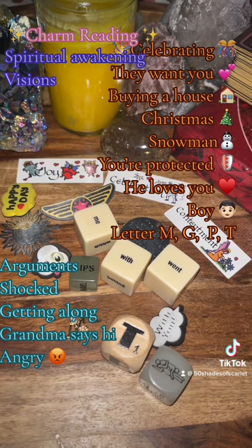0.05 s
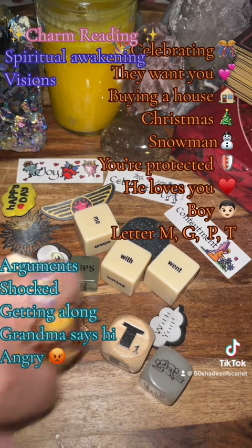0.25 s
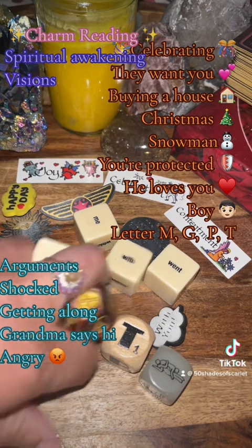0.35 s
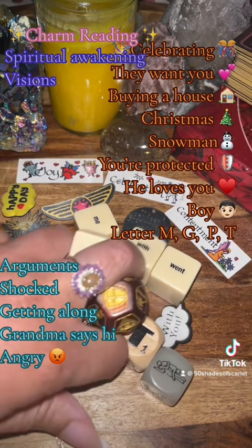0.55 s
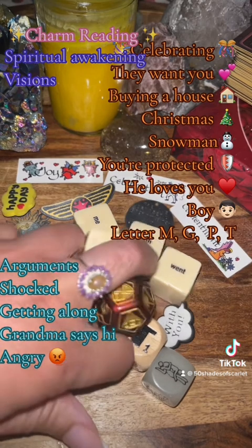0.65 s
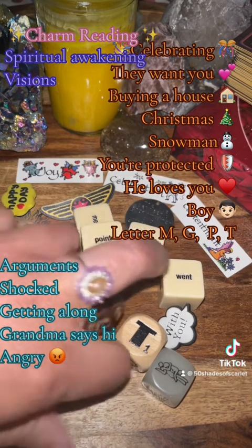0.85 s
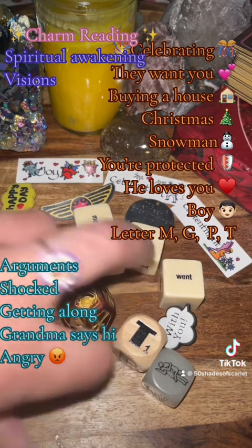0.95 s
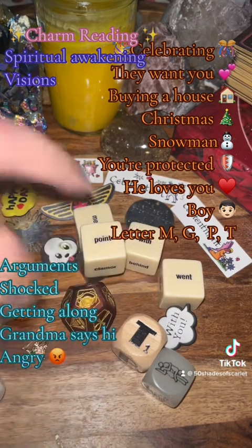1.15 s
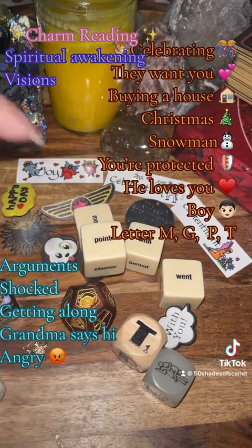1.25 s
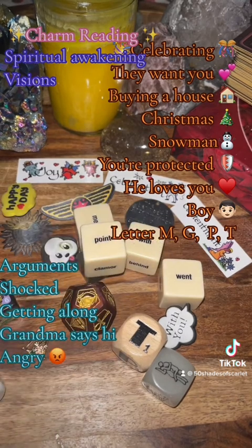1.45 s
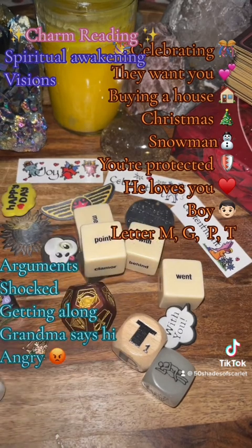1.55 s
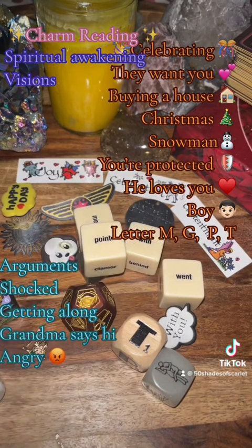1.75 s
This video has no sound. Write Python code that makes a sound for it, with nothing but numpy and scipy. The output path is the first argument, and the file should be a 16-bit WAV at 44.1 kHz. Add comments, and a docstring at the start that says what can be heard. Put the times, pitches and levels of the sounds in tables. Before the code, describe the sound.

After a brief brush of handling, dice tumble onto wood with woody knocks, low thuds and hard clicks for under a second; then near quiet over low hum, tiny chirps, one charm ping and swelling rubbing.

```python
"""Over low hum and quiet air, a brief brush of handling fades and light charm ticks lead in.
A handful of small dice and charms then tumbles from a hand onto a wooden table, close to the microphone:
shaped pulses thud, knock and click, damped modes ring the board and dice, and a small room answers.
After the tumble has ended come three faint high chirps, tone bursts; one metal charm then pings
as a set of modes, and a soft rustle of rubbing grains and hiss swells over the last moments."""
import sys
import numpy as np
from scipy import signal
from scipy.fft import rfft, irfft, next_fast_len
from scipy.io import wavfile
from scipy.ndimage import map_coordinates

SR = 44100
rng = np.random.default_rng(int(sys.argv[2]) if len(sys.argv) > 2 else 0)


def log_audio(samples):
    """Write samples as a 16-bit WAV file to the path given in sys.argv[1]."""
    # one column per channel
    frames = np.atleast_2d(samples).T
    # limit to full scale, then quantise
    limited = np.clip(frames, -1, 1)
    pcm = np.round(limited * 32767).astype(np.int16)
    wavfile.write(sys.argv[1], SR, pcm)


N = 79380  # scene length, samples
LENGTH = 16384  # length of one struck sound, samples
LEVEL_SPAN = 176  # samples (4 ms) over which a strike's level is set
RING_ATTACK_S = 0.0007


def amp(db):
    """Decibels to linear gain."""
    return 10 ** (np.asarray(db) / 20)


def unit(x):
    """Scale to rms 1."""
    return x / np.sqrt(np.mean(x ** 2) + 1e-20)


def along(points, hz):
    """Read (f/Hz, value) points at the given frequencies, on a log axis."""
    f, v = np.transpose(points)
    return np.interp(np.log(hz + 1), np.log(f + 1), v)


def fade(t, t60):
    """Exponential decay: 60 dB down after t60 seconds."""
    return 1000.0 ** (-t / np.maximum(t60, 1e-4))


def filtered(x, response):
    """Shape the spectrum of x by a response of frequency, with padding against wrap-around."""
    m = next_fast_len(N + SR // 2)
    return irfft(rfft(x, m) * response(np.fft.rfftfreq(m, 1 / SR)), m)[:N]


def add(track, s, sound):
    """Mix a sound in at time s."""
    i = max(0, round(s * SR))
    track[i:i + len(sound)] += sound[:N - i]


def pulse(colour):
    """Spectrum of the sharpest causal (minimum-phase) pulse with this colour."""
    log_gain = np.log(amp(along(colour, np.fft.rfftfreq(LENGTH, 1 / SR))))
    cepstrum = irfft(log_gain)
    # Folding the cepstrum forward in time makes the pulse causal
    cepstrum[1:LENGTH // 2] *= 2
    cepstrum[LENGTH // 2 + 1:] = 0
    return np.exp(rfft(cepstrum))


def strike(spectrum, scatter_db, t60, rise_s):
    """A pulse with a short rise and a quick scatter of rebounds; rms 1 over its first 4 ms."""
    t = np.arange(LENGTH) / SR
    force = rng.standard_normal(LENGTH) * fade(t, t60)
    force *= amp(scatter_db) / np.linalg.norm(force)
    force[0] += 1  # the first impact
    hit = irfft(rfft(force) * spectrum) * (1 - np.exp(-t / rise_s))
    return hit / np.sqrt(np.mean(hit[:LEVEL_SPAN] ** 2))


def ring(modes, gains, spread_db, pitch=1):
    """Damped modes, struck a little differently each time."""
    t = np.arange(LENGTH) / SR
    hz, db, t60 = np.transpose(modes)
    size = gains * amp(db + spread_db * rng.standard_normal(len(hz)))
    rise = 1 - np.exp(-(t / RING_ATTACK_S) ** 2)
    waves = np.sin(2 * np.pi * pitch * hz[:, None] * t) * fade(t, t60[:, None])
    return rise * (size @ waves)


ROOM_DB, ROOM_BUILDUP_S = -9, 0.0033
# Decay of the small room: (f/Hz, t60/s)
ROOM_DECAY = [(150, .26), (600, 0.21), (1400, .24), (3500, 0.21), (7000, 0.35), (14000, .16)]


def in_room(sound):
    """The sound and its room tail: noise that builds up, then decays at its own rate in each band."""
    hz, t, z = signal.stft(rng.standard_normal(LENGTH), SR, nperseg=256)
    tail = signal.istft(z * fade(t, along(ROOM_DECAY, hz)[:, None]), SR, nperseg=256)[1]
    tail *= 1 - np.exp(-(np.arange(len(tail)) / SR / ROOM_BUILDUP_S) ** 2)
    tail /= np.linalg.norm(tail)
    return sound + amp(ROOM_DB) * signal.fftconvolve(sound, tail)[:LENGTH]


BASS_CUT_HZ = 114
# Dice contacts, levels ahead of the bass cut: (t/s, thud level/dB, knock level/dB, click level/dB)
DICE_CONTACTS = [(0.2214, -16, -15.5, -31), (0.2257, -42, -25.5, -34), (0.2338, -23, -20, -35.5),
                 (0.2436, -39, -38, -50), (0.2936, -18.5, -17.5, -39), (0.314, -22, -21, -38),
                 (0.3164, -26, -29, -30.5), (0.324, -34, -22.5, -50), (0.3314, -27.5, -29, -33.5),
                 (0.4398, -27.5, -22.5, -27.5), (0.4491, -44, -30.5, -36), (.4652, -35, -32.5, -35),
                 (0.482, -32.5, -29.5, -43), (0.5028, -36, -27, -39.5), (0.5134, -31.5, -29, -21),
                 (.542, -27, -25, -35), (0.5548, -31, -29.5, -56), (.561, -25.5, -28.5, -30),
                 (.5642, -29, -27.5, -32.5), (0.594, -28.5, -33, -40.5), (0.604, -32, -40, -53),
                 (0.6487, -13.5, -17.5, -26), (0.6581, -25, -29, -43), (.6655, -31.5, -47, -36.5),
                 (0.6689, -29.5, -20.5, -32), (0.6834, -23.5, -21.5, -25), (0.688, -54, -23.5, -30),
                 (0.694, -44, -29, -40.5), (0.7002, -26, -24.5, -36), (0.7124, -27, -22.5, -45),
                 (0.7227, -31, -25, -43), (0.731, -32, -29.5, -37.5), (0.7426, -30, -23.5, -26),
                 (0.75, -35, -37.5, -41), (0.773, -34, -39, -56), (0.7787, -21, -19, -46.5),
                 (.7853, -26.5, -21.5, -55), (0.7953, -24.5, -37, -60), (0.806, -32.5, -39.5, -32),
                 (0.8207, -28, -15, -21.5), (0.8239, -28.5, -42, -45), (0.8315, -36, -31, -35),
                 (0.8375, -43, -53, -38), (0.8493, -28, -21, -55), (0.8512, -29.5, -47, -28.5),
                 (0.859, -56.5, -37.5, -55)]


def dice():
    """Each contact thuds, knocks and clicks in the room, and sets the board and a die ringing."""
    out = np.zeros(N)
    for s, thud_db, knock_db, click_db in DICE_CONTACTS:
        hit = amp(thud_db) * thud() + amp(knock_db) * knock() + amp(click_db) * click()
        ringing = die_ring(click_db) + board_ring(thud_db, knock_db)
        add(out, s, in_room(hit) + ringing)
    bass_cut = signal.butter(2, BASS_CUT_HZ, "highpass", fs=SR, output="sos")
    return signal.sosfilt(bass_cut, out)


# Colour of the board's thud: (f/Hz, relative level/dB)
THUD_COLOUR = [(60, -29), (130, -31), (190, 3), (300, -1), (500, -1.5), (800, -14.5), (1500, -36.5),
               (4000, -85)]


def thud():
    """The deep part of a contact: a low pulse with the longest scatter of rebounds."""
    return strike(pulse(THUD_COLOUR), scatter_db=-3.5, t60=0.036, rise_s=0.00035)


# Colour of the knock: (f/Hz, relative level/dB)
KNOCK_COLOUR = [(150, -35), (450, -9.5), (750, -3), (1150, 1), (1600, -3.5), (2100, -7.5), (3000, -19),
                (7000, -60.5)]


def knock():
    """The woody middle of a contact: a pulse strongest around 1 kHz."""
    return strike(pulse(KNOCK_COLOUR), scatter_db=-5, t60=0.019, rise_s=0.00046)


# Colour of the hard click: (f/Hz, relative level/dB)
CLICK_COLOUR = [(700, -34.5), (1800, 8.5), (2800, 5), (4200, 3.5), (5200, -16.5), (6500, -29), (8500, -41),
                (11000, -60.5), (15000, -57.5)]


def click():
    """The hard edge of a contact: a bright pulse with strong, very short rebounds."""
    return strike(pulse(CLICK_COLOUR), scatter_db=2, t60=0.01, rise_s=0.00086)


THUD_TOP_HZ = 650  # modes below this follow the thud, the others the knock
# Modes of the wooden board: (f/Hz, relative level/dB, t60/s)
BOARD_MODES = [(205.5, -5.5, 0.18), (348.3, -13, .1), (560, -17, 0.1), (804, -12.5, 0.066),
               (1072, -11, .14), (1229, -20, 0.16), (1295, -21, 0.068), (1558, -26.5, 0.23),
               (1700, -21, 0.28), (1822, -17.5, 0.1), (2094, -29.5, 0.23), (2570, -24.5, .2),
               (3220, -23, 0.13)]


def board_ring(thud_db, knock_db):
    """The thud drives the board's low modes, the knock its high ones."""
    low = np.transpose(BOARD_MODES)[0] < THUD_TOP_HZ
    return ring(BOARD_MODES, amp(np.where(low, thud_db, knock_db)), spread_db=3)


DIE_SIZE_SPREAD = 0.034  # spread of log pitch from die to die
# Modes of a middle-sized die: (f/Hz, relative level/dB, t60/s)
DIE_MODES = [(2620, -13, 0.065), (3400, -10, 0.03), (4190, -11.5, 0.031), (5540, -26, 0.044)]


def die_ring(click_db):
    """The click drives the die's own modes; dice of different size shift them all together."""
    pitch = np.exp(DIE_SIZE_SPREAD * rng.standard_normal())
    return ring(DIE_MODES, amp(click_db), spread_db=6, pitch=pitch)


TICK_PIVOT_HZ = 4000  # the brightness tilt turns about this
# Light ticks of the charms: (t/s, level/dB, brightness/dB per octave)
CHARM_TICKS = [(.067, -47, 0.5), (.1155, -35, 1), (.2225, -36, 0.5), (.2255, -30, -2), (.2415, -31, -1),
               (.252, -45, -4), (.2735, -38, 2), (.278, -41, 0), (.3172, -31.5, -0.5), (.4268, -33, -9.5),
               (.434, -40.5, -1), (.5005, -37.5, 2), (.5033, -33.5, 5.5), (0.5106, -31, 2.5),
               (.522, -35, 2.5), (.6488, -28, 1), (0.6814, -36, -7.5), (1.251, -41, -9),
               (1.2645, -49, 10.5), (1.41, -40, -9)]
# Colour of a tick before its tilt: (f/Hz, relative level/dB)
TICK_COLOUR = [(300, -26), (1200, -7), (2800, 4), (4600, 2), (5600, -5), (6600, -13), (9000, -29.5),
               (13000, -34), (16000, -33.5)]


def charm_ticks():
    """Light contacts as short pulses, each tilted duller or brighter, in the room."""
    out = np.zeros(N)
    for s, db, brightness in CHARM_TICKS:
        colour = [(hz, level + brightness * np.log2(hz / TICK_PIVOT_HZ)) for hz, level in TICK_COLOUR]
        tick = strike(pulse(colour), scatter_db=2.5, t60=0.012, rise_s=0.00097)
        add(out, s, in_room(amp(db) * tick))
    return out


PING_S, PING_KNOCK_DB, PING_THUD_DB = 1.2645, -35, -47
# Modes of the metal charm: (f/Hz, level/dB, t60/s)
PING_MODES = [(228, -32, .09), (1040, -48, .06), (2150, -42, .04), (3483, -38, .09), (3455, -55, .7),
              (4064, -54, .06), (5744, -59, .11), (8441, -55, .3)]


def metal_charm():
    """One metal charm knocks the board, and its damped modes ping."""
    out = np.zeros(N)
    hit = amp(PING_KNOCK_DB) * knock() + amp(PING_THUD_DB) * thud()
    add(out, PING_S, in_room(hit) + ring(PING_MODES, 1, spread_db=2.5))
    return out


GRAINS_PER_S, HISS_DB = 830, 2.5  # hiss level is relative to the grains
CLUMP_DB, CLUMPS_PER_S = 4.5, 90  # depth and pace of the grains' random swells
# Course of the handling noise: (t/s, level/dB)
RUSTLE_LEVEL = [(0, -47), (.04, -61.5), (.085, -47), (.12, -67), (.3, -72), (1.25, -71), (1.39, -55),
                (1.43, -51.5), (1.465, -45.5), (1.52, -49.5), (1.575, -43.5), (1.67, -52.5), (1.725, -45.5),
                (1.8, -48)]
# Colour of the handling noise: (f/Hz, relative level/dB)
RUSTLE_TONE = [(300, -9), (700, -9), (1200, 0.5), (2200, -2), (3600, -4.5), (5200, -15), (7000, -28.5),
               (10500, -44.5), (13000, -30.5), (15500, -31)]


def handling():
    """Clumps of tiny rubbing grains on a soft hiss."""
    t = np.arange(N) / SR
    grains = rng.standard_normal(N) * (rng.random(N) < GRAINS_PER_S / SR)
    swell = map_coordinates(rng.standard_normal(LENGTH), [t * CLUMPS_PER_S])
    clumped = amp(CLUMP_DB * swell) * unit(grains)
    hiss = amp(HISS_DB) * rng.standard_normal(N)
    rub = filtered(clumped + hiss, lambda hz: amp(along(RUSTLE_TONE, hz)))
    return unit(rub) * amp(np.interp(t, *np.transpose(RUSTLE_LEVEL)))


CHIRP_HZ, CHIRP_WIDTH_S = 3920, 0.0064
# Faint high chirps: (t/s at the peak, peak level/dB)
CHIRP_TIMES = [(1.078, -61), (1.137, -57), (1.203, -56)]


def chirps():
    """Three faint, short high tones of steady pitch under bell-shaped envelopes."""
    t = np.arange(N) / SR
    envelope = sum(amp(db) * np.exp(-((t - s) / CHIRP_WIDTH_S) ** 2) for s, db in CHIRP_TIMES)
    return np.sin(2 * np.pi * CHIRP_HZ * t) * envelope


AIR_DB = -50  # rms
# Colour of the quiet air: (f/Hz, relative level/dB)
AIR_COLOUR = [(20, -23), (40, -15), (58, -0.5), (80, -14), (125, 1), (170, -3), (240, 2.5), (350, -7),
              (520, -13.5), (800, -12), (1200, -14), (1800, -17.5), (2300, -24), (3400, -24.5),
              (5000, -34.5), (6500, -40.5), (9000, -50.5), (15500, -61)]
# Steady tones, low hum and faint higher whines: (f/Hz, rms level/dB)
HUM_TONES = [(58, -54), (120, -57.5), (1683, -64.5), (2990, -72)]


def room_tone():
    """Quiet air as coloured noise, with steady sines for the hum and whines."""
    t = np.arange(N) / SR
    air = unit(filtered(rng.standard_normal(N), lambda hz: amp(along(AIR_COLOUR, hz))))
    out = amp(AIR_DB) * air
    for hz, db in HUM_TONES:
        out += amp(db) * np.sqrt(2) * np.sin(2 * np.pi * (hz * t + rng.random()))
    return out


def scene():
    """All layers, from the dice back to the room tone, as one channel."""
    return (dice() + charm_ticks() + metal_charm() + handling() + chirps() + room_tone())[None]


TOP_HZ = 15750


def record(dry):
    """Nothing is kept above the band limit."""
    return np.array([filtered(x, lambda hz: hz < TOP_HZ) for x in dry])


dry = scene()
out = record(dry)
log_audio(out)
```